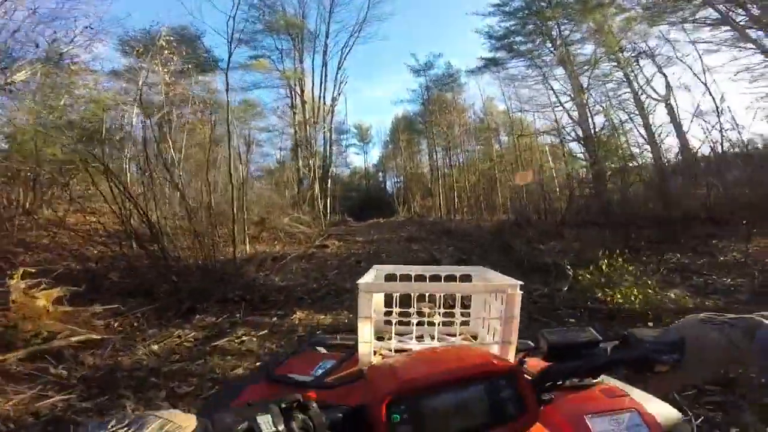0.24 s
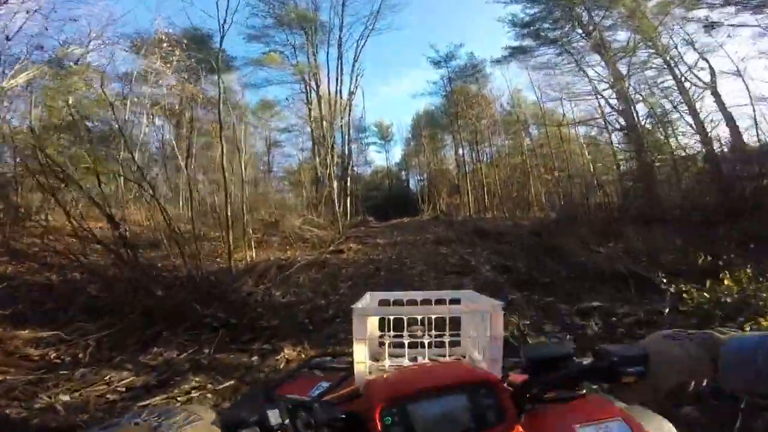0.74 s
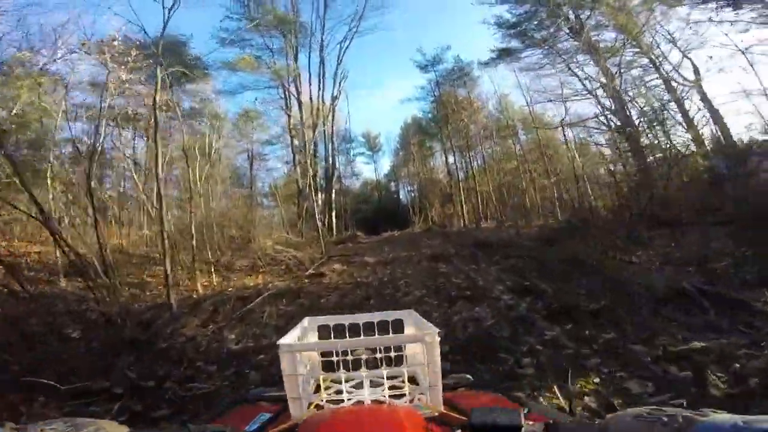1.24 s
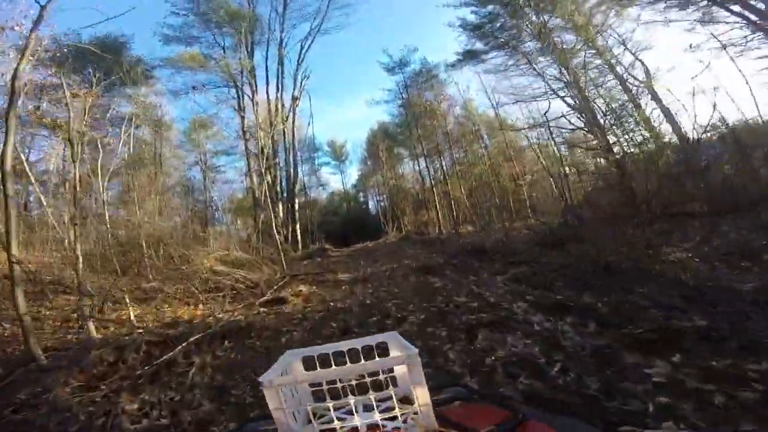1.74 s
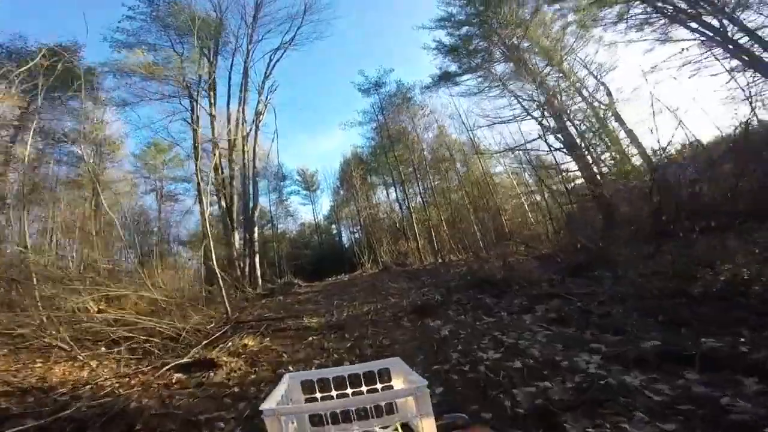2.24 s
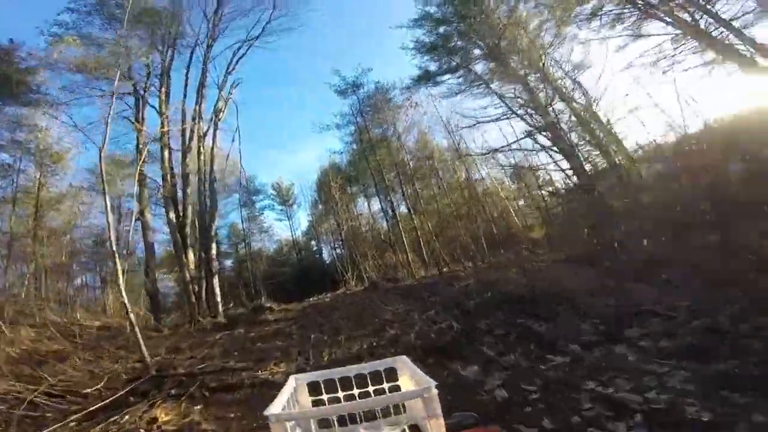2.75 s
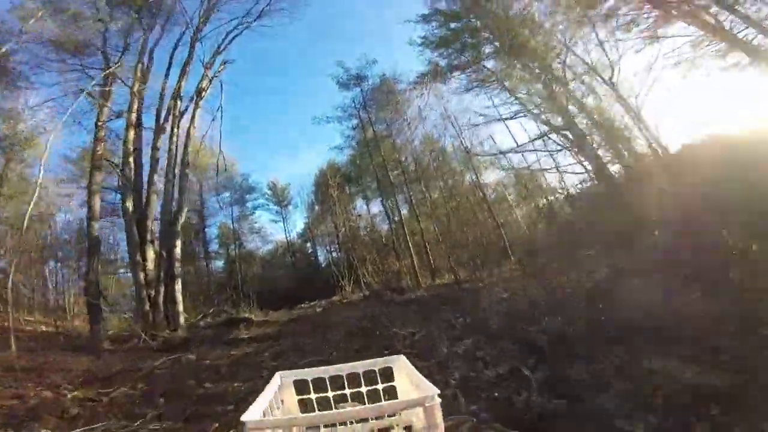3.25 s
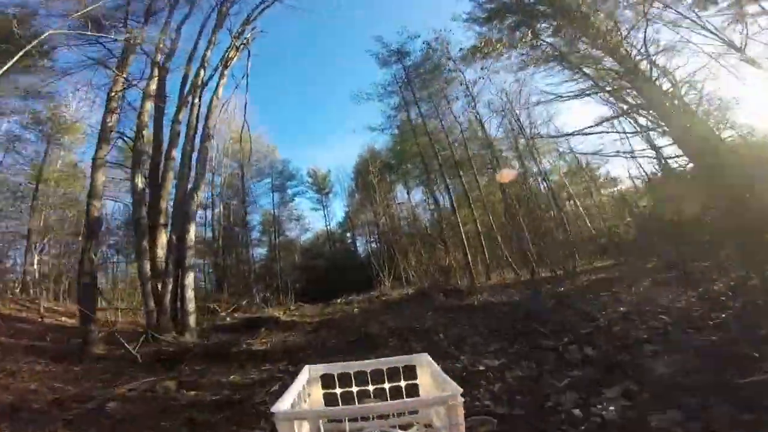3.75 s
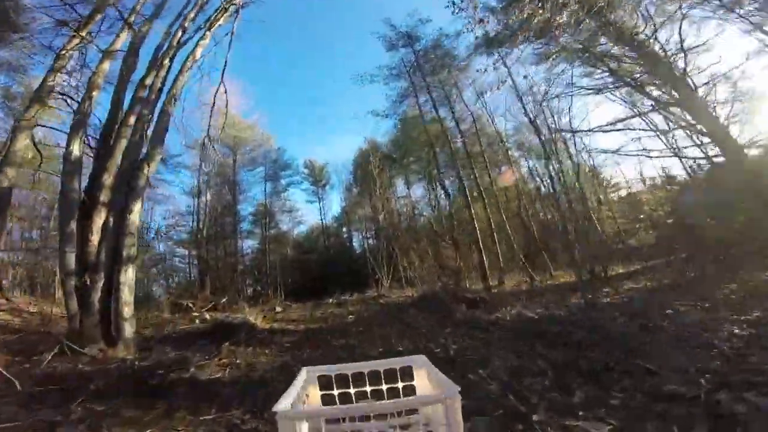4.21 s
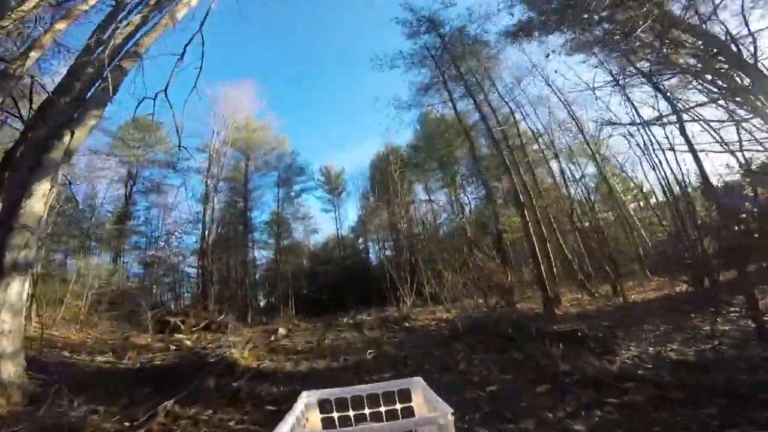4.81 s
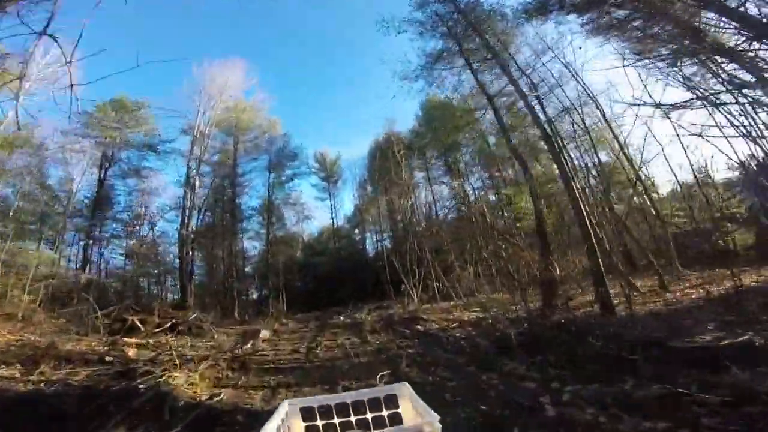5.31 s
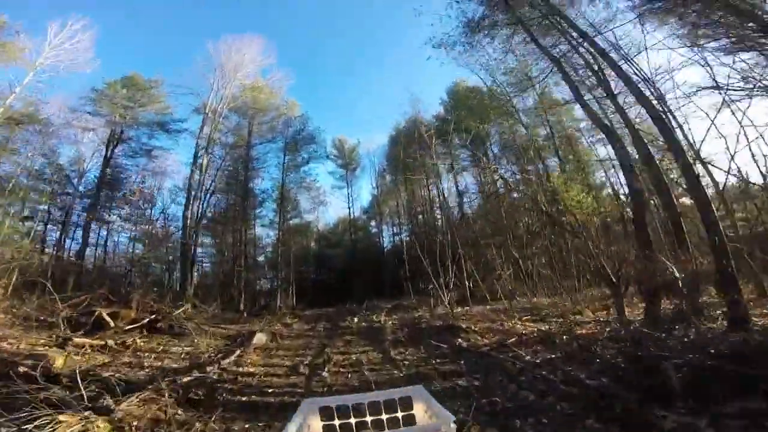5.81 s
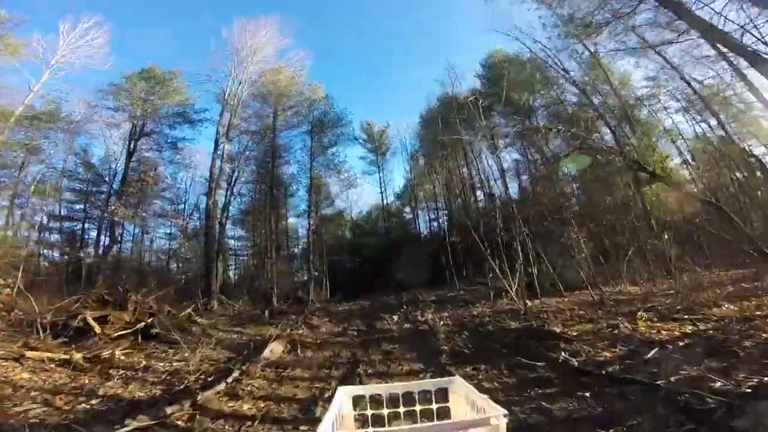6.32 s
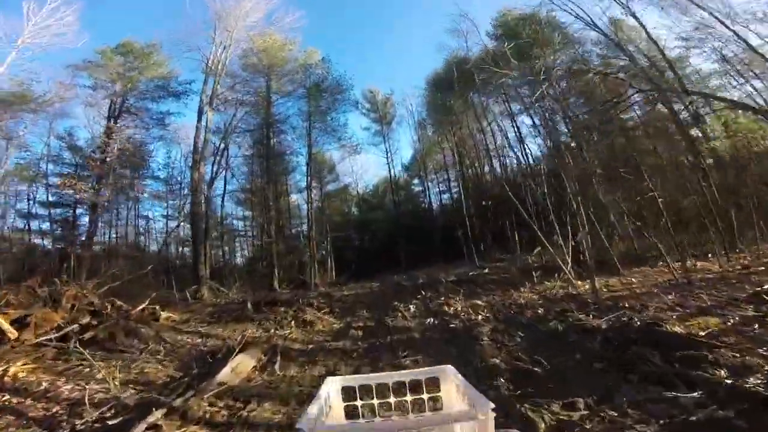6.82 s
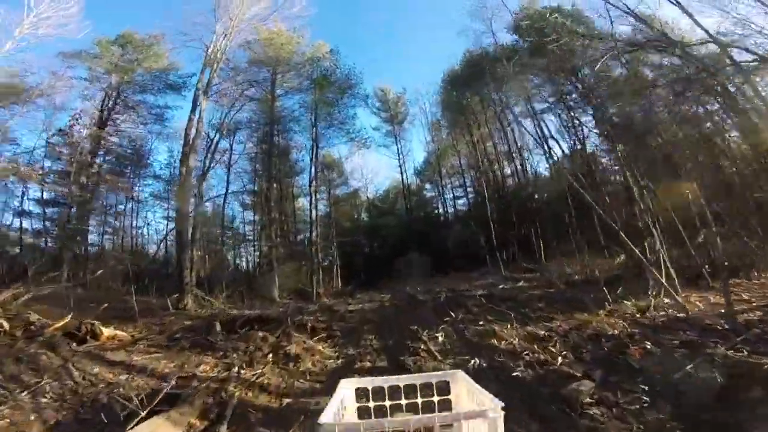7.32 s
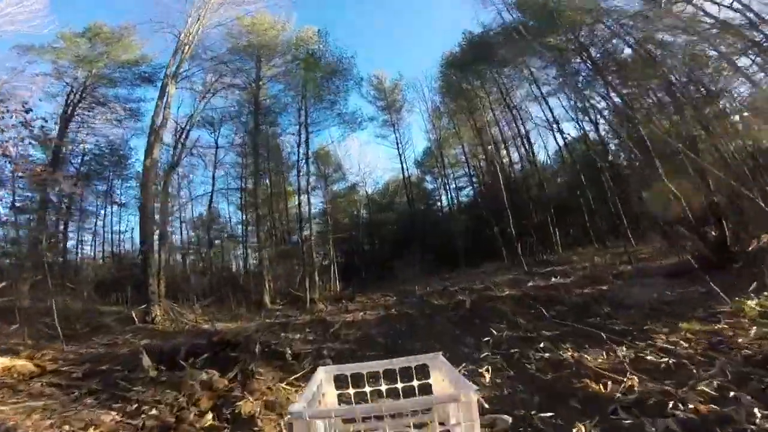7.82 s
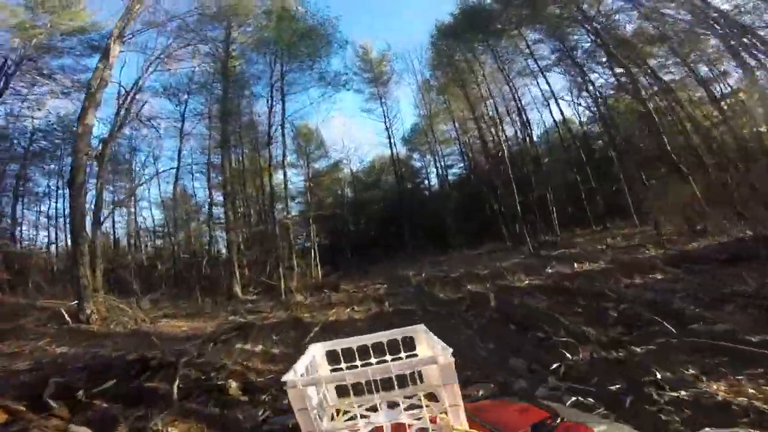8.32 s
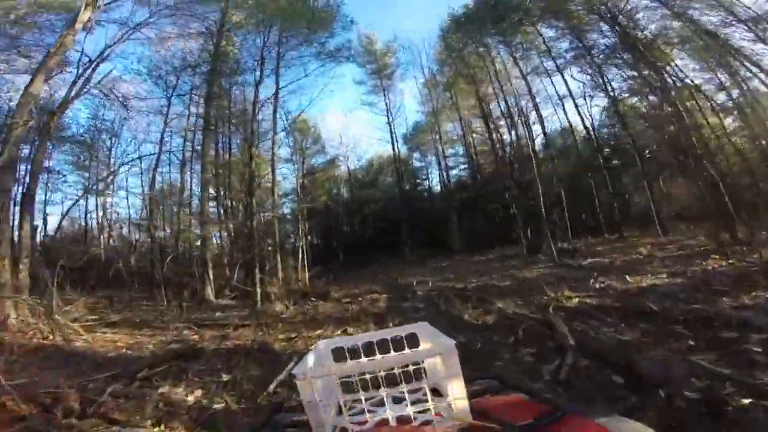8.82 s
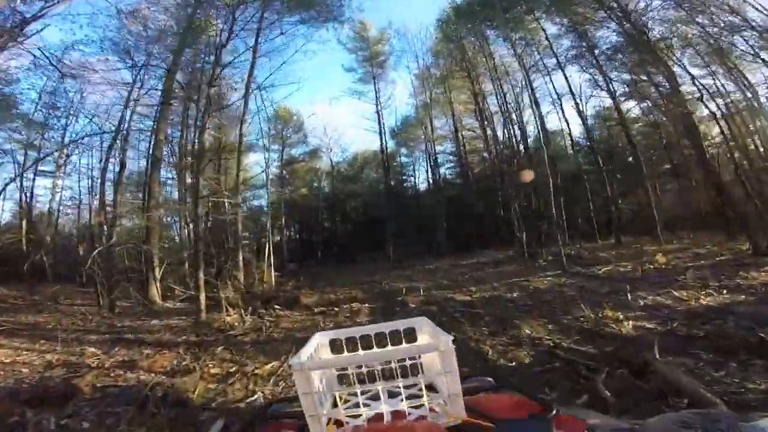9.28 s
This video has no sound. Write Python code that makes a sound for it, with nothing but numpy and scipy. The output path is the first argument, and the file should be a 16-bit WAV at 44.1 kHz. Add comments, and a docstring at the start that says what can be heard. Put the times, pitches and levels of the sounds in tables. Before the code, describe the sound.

A quad bike putters along slowly with a clattering engine, its tyres snapping sticks and crunching dry leaves.

```python
"""On a woodland trail a single-cylinder quad bike crawls along, heard from a camera on the rider.
Periodic gas pulses make the exhaust putter, and valve impacts clatter over the rasp of the gears.
The tyres shake the frame, crush leaves and snap sticks; bumps thud and a loose metal part clinks.
The camera's plastic case acts as a filter: it muffles the treble and rings at its own resonances."""
import sys
import numpy as np
from scipy import signal
from scipy.fft import rfft, irfft
from scipy.io import wavfile
from scipy.ndimage import uniform_filter1d

SR = 44100
rng = np.random.default_rng(int(sys.argv[2]) if len(sys.argv) > 2 else 0)


def wav_record(signal):
    """Record a signal, one row per channel, as 16-bit PCM in the file named by sys.argv[1]."""
    frames = np.transpose(np.atleast_2d(signal))
    bounded = np.clip(frames, -1, 1)
    # unit amplitude maps onto the largest positive 16-bit level
    quanta = np.round(bounded * 32767).astype(np.int16)
    wavfile.write(sys.argv[1], SR, quanta)


N = 421155
TIME = np.arange(N) / SR


def undb(db):
    """Amplitude grows tenfold for every 20 dB."""
    return 10 ** (np.asarray(db) / 20)


def unit(x):
    """Normalisation to an rms of 1."""
    return x / np.sqrt(np.mean(x ** 2))


def power_sum_db(gains):
    """Incoherent addition: unrelated sounds sum in power."""
    return 10 * np.log10(sum(g ** 2 for g in gains))


def wander(rate_hz):
    """A moving average smooths random steps into a drift of rms 1."""
    k = int(SR / rate_hz)
    steps = np.repeat(rng.standard_normal(N // k + 1), k)
    return unit(uniform_filter1d(steps, k)[:N])


def swell(s, attack, release):
    """Exponential growth to 1 at time s, then exponential decay."""
    return np.exp(np.minimum((TIME - s) / attack, (s - TIME) / release))


def add(track, s, sound):
    """Superposition: a sound joins the track at time s."""
    i = int(s * SR)
    track[i:i + len(sound)] += sound[:N - i]


def burst(response, t60, rise, ragged_db):
    """Impact excitation: a dying cluster of blows drives a resonant body; the envelope sets the energy."""
    t = TIME[:SR // 4]
    envelope = undb(-60 * t / t60) * (1 - np.exp(-t / rise))
    sizes = undb(ragged_db * np.repeat(rng.standard_normal(len(t)), 32)[:len(t)])
    blows = envelope * sizes * rng.standard_normal(len(t))
    x = signal.fftconvolve(blows, response)[:len(t)]
    return x * np.linalg.norm(envelope) / np.linalg.norm(x)


def ring(x, hz, width_hz, direct):
    """Resonance stresses one band over a direct share of the sound, at equal total energy."""
    y = direct * x + signal.lfilter(*signal.iirpeak(hz, hz / width_hz, fs=SR), x)
    return y * np.linalg.norm(x) / np.linalg.norm(y)


# Resonances of the case. Each row: centre in Hz, width in Hz, boost in dB.
CASE_MODES = [(930, 16, 4), (1349, 140, 5), (1481, 213, 12), (1948, 47, 6), (2094, 224, 7.5),
              (2583, 75, 10), (2734, 250, 5.5), (2943, 77, 8), (3201, 137, 7), (3348, 181, 13),
              (4020, 290, 5), (4780, 100, 6.5), (5490, 87, 5.5), (6065, 320, 7), (7870, 210, 6),
              (8840, 560, 5.5)]

def case_response(spectrum):
    """Filters in series add in dB: source spectrum and case modes give one unit-energy impulse response."""
    size = 8192
    f = np.arange(size // 2 + 1) * SR / size
    hz, db = np.transpose(spectrum)
    db = np.interp(np.log(f + 1), np.log(hz), db)
    db -= 40 * np.log10(np.maximum(f / hz[-1], 1))  # 12 dB per octave above the last row
    db += sum(boost / (1 + (2 * (f - centre) / width) ** 2) for centre, width, boost in CASE_MODES)
    # minimum phase: every impact starts sharply and rings afterwards
    cepstrum = irfft(np.log(undb(db)))
    response = irfft(np.exp(rfft(2 * cepstrum[:size // 2], size)))
    return response / np.linalg.norm(response)


def through_case(x, spectrum):
    """Convolution gives an excitation the colour of its source and of the case."""
    return signal.fftconvolve(x, case_response(spectrum))[:N]


# Spectra of the muffler and the air box. Each row: frequency in Hz, relative level in dB.
MUFFLER_SPECTRUM = [(20, -3.5), (30, 1.5), (50, -25), (78, -11), (96, 1.5), (112, 1), (136, 2.5),
                    (158, -11.5), (215, -22), (290, -18.5), (420, -29), (900, -43)]
AIRBOX_SPECTRUM = [(60, -35), (160, -8), (205, -8), (235, 3.5), (265, -4), (330, -14.5), (500, -35),
                   (1200, -57)]

def engine_putter(cycle, throb_db, pipe_db, intake_db):
    """Forced vibration: the crank shakes twice per firing; uneven pulses drive muffler and air box."""
    throb = unit(np.sin(4 * np.pi * cycle) * undb(2.4 * wander(12)))
    firings = np.diff(np.floor(cycle), prepend=0)
    puffs = unit(firings * undb(0.57 * rng.standard_normal(N)))
    gulps = unit(firings * undb(2.0 * rng.standard_normal(N)))
    muffler = through_case(puffs * undb(pipe_db), MUFFLER_SPECTRUM)
    airbox = through_case(gulps * undb(intake_db), AIRBOX_SPECTRUM)
    return throb * undb(throb_db) + muffler + airbox


# Valve closures. Each row: place in the engine cycle from 0 to 1, relative level in dB.
VALVE_CLOSURES = [(.07, 5.5), (.5, 7)]
# Spectra of the valves and the gears. Each row: frequency in Hz, relative level in dB.
TICK_SPECTRUM = [(500, -30), (1400, -1.5), (2400, -2.5), (3000, 0.5), (3380, -2.5), (3800, -6), (5000, -24),
                 (6500, -9), (8500, -17.5), (10000, -28), (15000, -36)]
RASP_SPECTRUM = [(150, -17.5), (300, 8), (500, 3), (800, -2.5), (1150, -2.5), (1500, 2), (2000, 1),
                 (2400, -6), (3100, -6.5), (3700, -8.5), (5000, -16), (8500, -20), (10000, -23.5),
                 (15000, -34.5)]

def valve_gear(cycle, rasp_db, tick_db):
    """Amplitude-modulated noise: two valves tick per cycle, and chain and gears surge with each firing."""
    firing = cycle.astype(int)
    strength = undb(1.8 * rng.standard_normal((N // 100, len(VALVE_CLOSURES))))
    ticks = 0
    for k, (place, db) in enumerate(VALVE_CLOSURES):
        age = ((cycle - place) % 1) / 0.055  # a tick peaks 0.055 cycles after the closure
        ticks += undb(db) * strength[firing, k] * age * np.exp(-age)
    valves = through_case(unit(ticks * rng.standard_normal(N)) * undb(tick_db), TICK_SPECTRUM)
    surge_db = 2.0 * np.cos(2 * np.pi * (cycle + 0.2)) + 0.72 * wander(90) + 1.2 * wander(11)
    gears = through_case(rng.standard_normal(N) * undb(rasp_db + surge_db), RASP_SPECTRUM)
    return valves + gears


# Dips in the trail. Each row: peak time in seconds, half-width in seconds, sway in dB, throb in dB.
DIPS = [(0.08, 0.088, -44, -41), (0.75, 0.28, -48, -37.5), (1.66, .15, -37.5, -47), (3.64, .12, -47, -45.5),
        (8.62, 0.14, -39, -64), (9.08, 0.13, -40.5, -51)]

def lurches(sway_db, throb_db):
    """Transient loading: each dip adds a Gaussian swell to the frame's sway and the crank's throb."""
    sway, throb = [undb(sway_db)], [undb(throb_db)]
    for s, width, heave_db, labour_db in DIPS:
        dip = np.exp(-((TIME - s) / width) ** 2)
        sway.append(undb(heave_db) * dip)
        throb.append(undb(labour_db) * dip)
    return power_sum_db(sway), power_sum_db(throb)


# Roots and ruts. Each row: start in seconds, level in dB, ring in Hz, 60 dB decay in seconds (capped below).
JOLTS = [(0.421, -39, 191, 0.18), (0.602, -38.5, 235, 0.31), (1.164, -35.5, 182, 0.24),
         (1.549, -38, 240, 0.3), (1.83, -32.5, 143, 0.27), (1.864, -30, 232, 0.14),
         (3.271, -39.5, 153, 0.22), (3.695, -34.5, 308, 0.33), (3.744, -29, 410, 0.096),
         (4.279, -37, 225, 0.16), (4.428, -39.5, 183, .14), (5.491, -39, 441, 0.24),
         (5.673, -35.5, 283, .15), (6.716, -40.5, 275, 0.18), (6.919, -37, 198, 0.32),
         (7.413, -35, 199, 0.11), (7.755, -37, 143, 0.18), (7.832, -33.5, 217, 0.14),
         (8.147, -35.5, 440, .12), (8.357, -33, 206, 0.19), (8.449, -33, 230, 0.14),
         (8.499, -36.5, 261, 0.18), (8.656, -35, 186, 0.15), (8.852, -34, 180, 0.23),
         (8.913, -30.5, 142, 0.13), (9.278, -33.5, 230, 0.25), (9.319, -30, 202, 0.12)]
# Spectra of the panel, the frame and the tyres. Each row: frequency in Hz, relative level in dB.
PANEL_SPECTRUM = [(40, -1), (110, -8), (180, 2.5), (300, -1.5), (500, -2.5), (800, -18), (1500, -18),
                  (3000, -21), (4500, -49)]
SWAY_SPECTRUM = [(5, -8), (15, -1), (28, 7.5), (50, -2), (90, -13), (300, -109)]
RUMBLE_SPECTRUM = [(30, -8.5), (70, 2.5), (130, 0), (220, 2.5), (330, -6), (500, -9), (800, -13.5),
                   (1500, -32), (4000, -81)]

def chassis(sway_db, rolling_db):
    """Structure-borne sound: knobbly tyres shake the frame, and each jolt sets a plastic panel booming."""
    thuds, panel = np.zeros(N), case_response(PANEL_SPECTRUM)
    roughness = [undb(rolling_db)]
    for s, db, hz, t60 in JOLTS:
        blow = burst(panel, min(t60, 0.28), rise=0.0032, ragged_db=2)
        add(thuds, s, undb(db) * ring(blow, hz, width_hz=22, direct=0.57))
        roughness.append(undb(db - 19) * swell(s, 0.14, 0.14))  # rough ground around the bump
    sway = through_case(rng.standard_normal(N) * undb(sway_db), SWAY_SPECTRUM)
    shaking = rng.standard_normal(N) * undb(power_sum_db(roughness) + wander(16))
    return sway + through_case(shaking, RUMBLE_SPECTRUM) + thuds


# Heaps of dry brush. Each row: peak time in seconds, level in dB, attack and release in seconds.
BRUSH_HEAPS = [(1.87, -45, .05, 0.093), (2.288, -34, 0.088, 0.093), (2.62, -49, 0.17, 0.43),
               (3.68, -48, 0.079, .1), (5.32, -46, 0.05, 0.12), (5.49, -42, 0.04, 0.13),
               (5.92, -53, 0.079, .35), (8.92, -50.5, 0.36, 0.4)]
# Spectra of crushed leaves and splinters. Each row: frequency in Hz, relative level in dB.
CRUNCH_SPECTRUM = [(300, -21), (1000, -6), (1500, 5), (2600, 5), (3300, 4), (4500, -6.5), (6500, -4.5),
                   (8500, -15), (10000, -24), (15000, -34)]
SPLINTER_SPECTRUM = [(2500, -67), (4500, -2), (6500, 8), (8500, 3), (10000, -5), (15000, -20)]

def leaves(litter_db, per_second=2800, spread_db=3.0):
    """Shot noise: countless tiny fractures merge; the harder the tyres crush, the brighter the sound."""
    heaps = [undb(db) * swell(s, attack, release) for s, db, attack, release in BRUSH_HEAPS]
    level_db = power_sum_db([undb(litter_db)] + heaps)
    sizes = undb(spread_db * np.minimum(rng.exponential(size=N), 5))
    signs = rng.choice([-1, 1], (2, N))
    fractures = rng.random(N) < per_second / SR
    grains = unit(fractures * sizes) * undb(level_db + 2.0 * wander(45))
    bright_db = 0.5 * (level_db - level_db.max()) - 9.5
    crunch = through_case(grains * signs[0], CRUNCH_SPECTRUM)
    splinters = through_case(grains * signs[1] * undb(bright_db), SPLINTER_SPECTRUM)
    return crunch + splinters


def twigs(per_second=2, db=-42, spread_db=6, hz=1920, knock_db=-16, splinter_db=-16, t60=0.042):
    """Small breaks scatter uniformly in time, level and pitch, as rows like those of the sticks."""
    chance = rng.random((int(per_second * N / SR), 3))
    return [(when * N / SR, db + spread_db * (2 * size - 1), hz * 2 ** (thin - 0.5),
             knock_db, splinter_db, t60) for when, size, thin in chance]


# Breaking sticks. Each row: start in seconds, level in dB, ring in Hz, knock and splinters in dB
# relative to the crack, the crack's 60 dB decay in seconds.
STICK_BREAKS = [(0.691, -35.5, 1460, -12, -12, 0.036), (1.796, -35, 3250, -21, -12, 0.084),
                (1.8163, -33.5, 3220, -15, -23, .056), (1.866, -32.5, 1370, -5, -22, 0.044),
                (1.945, -34, 1460, -19, -24, 0.053), (2.006, -31, 3070, -27, -26, 0.034),
                (2.314, -21.5, 2600, -24, -16, 0.071), (2.378, -31.5, 2130, -19, -13, 0.1),
                (2.54, -30.5, 3300, -17, -8, 0.03), (2.6947, -33, 1430, -13, -28, 0.033),
                (3.3105, -32, 1440, -18, -28, 0.026), (3.6636, -43.5, 1410, -19, 1, 0.046),
                (3.92, -33, 2010, -13, -14.5, .046), (4.2622, -33, 2080, -11, -15, 0.031),
                (5.2985, -34, 3320, -27, -14, .08), (5.3889, -25.5, 3430, -11, -17, 0.079),
                (5.4931, -10.3, 2140, -18.5, -20.5, .05), (5.537, -27.5, 1990, -6, -18, 0.041),
                (5.5792, -30, 2000, -15, -17, 0.07), (5.674, -21.5, 1320, -10, -16, 0.062),
                (5.742, -32, 1490, -25, -22, 0.033), (5.801, -23.5, 1950, -10, -7.5, 0.032),
                (5.8582, -25.5, 2450, -22, -17, 0.05), (5.871, -25.5, 2590, -18, -18, 0.034),
                (6.068, -29, 1460, -14, -19, 0.1), (6.1551, -36.5, 2880, -14, -28, 0.055),
                (6.214, -31, 1560, -18, -11.5, 0.043), (6.2848, -31.5, 1960, -26, -25, 0.045),
                (6.31, -32, 1950, -19, -23, 0.068), (7.1187, -28, 1980, -11, -21, .055),
                (7.607, -26, 1330, -10.5, -21.5, .1), (8.4915, -35, 1470, -17, -16, .12),
                (8.531, -27, 2070, -26, -14.5, 0.039), (8.898, -32, 3380, -12, -23, 0.045),
                (9.0728, -36, 3180, -23, -26, 0.13), (9.106, -30, 1420, -16, -28, .07),
                (9.1757, -31, 1590, -21, -4.5, 0.042), (9.194, -30, 1450, -28, -22, 0.074),
                (9.2222, -17.8, 1320, -18, -38, 0.03)]
# Spectra of the knock and the crack. Each row: frequency in Hz, relative level in dB.
KNOCK_SPECTRUM = [(80, -59), (250, 2), (550, -2), (820, 0), (1100, -1.5), (1600, -40), (4000, -92)]
CRACK_SPECTRUM = [(500, -50), (1100, -8.5), (1500, -3.5), (1900, 3), (2400, -1.5), (3300, -4), (4200, -9),
                  (6000, -29)]

def sticks():
    """Brittle fracture: fibres tear in a cluster, giving a ringing crack, a hollow knock and splinters."""
    out = np.zeros(N)
    knock, wood, splinter = map(case_response, (KNOCK_SPECTRUM, CRACK_SPECTRUM, SPLINTER_SPECTRUM))
    for s, db, hz, knock_db, splinter_db, t60 in STICK_BREAKS + twigs():
        rise = 0.011 * t60  # a slow break also takes longer to build
        crack = ring(burst(wood, t60, rise, ragged_db=4.0), hz, width_hz=330, direct=0.76)
        add(out, s, undb(db) * crack)
        add(out, s, undb(db + knock_db) * burst(knock, 1.32 * t60, rise, ragged_db=7.5))
        add(out, s, undb(db + splinter_db) * burst(splinter, 0.81 * t60, rise, ragged_db=1.5))
    return out


# Rattles of the loose metal part. Each row: start in seconds, level in dB.
RATTLES = [(1.6985, -50), (1.8144, -46), (2.0073, -48), (2.5411, -42.5), (2.7934, -51), (3.7843, -46),
           (4.3051, -52), (4.6354, -44.5), (5.0275, -48.5), (7.0249, -55), (7.3454, -54), (7.4294, -56),
           (8.0222, -46.5), (8.2694, -54), (9.0728, -48), (9.419, -52)]
# Its modes. Each row: frequency in Hz, relative level in dB, 60 dB decay in seconds.
METAL_MODES = [(5140, -3, .04), (6180, -6, 0.069), (7930, 3, .14), (8670, 3, .06), (8580, -3, 0.036),
               (9450, -6, .11), (10300, -6, .06), (12400, -13, .08), (12920, -15, .05), (14500, -11, .07)]

def clinks():
    """Modal vibration: a loose part chatters, exciting its damped modes in a different mix each time."""
    out, t = np.zeros(N), TIME[:SR // 4]
    modes = sum(undb(db - 60 * t / t60) * np.sin(2 * np.pi * hz * t) for hz, db, t60 in METAL_MODES)
    for s, db in RATTLES:
        add(out, s, undb(db) * burst(modes, t60=0.041, rise=0.00062, ragged_db=4))
    return out


# Engine speed. Each row: time in seconds, firing rate in Hz.
FIRING_RATE = [(0.0, 18.9), (0.42, 19.2), (0.87, 19.0), (1.75, 22.6), (2.2, 26.6), (2.66, 28.2),
               (3.48, 28.1), (4.23, 25.2), (5.18, 26.6), (5.56, 27.7), (6.28, 27.4), (6.6, 24.7),
               (6.97, 26.3), (7.87, 26.2), (8.01, 24.1), (8.24, 25.3), (8.56, 23.6), (9.55, 22.8)]
# The rider's throttle. Each row: time in seconds, opening from 0 to 1.
THROTTLE_OPENING = [(0, 0.4), (1.0, 0.7), (1.95, 0.7), (2.9, 0.67), (3.8, 0.95), (4.2, 0.42), (5.3, 0.5),
                    (5.7, 0.8), (6.55, 0.04), (7.3, 0), (7.8, 0.5), (8.1, 0.1), (8.5, 0.85), (9.2, 0.9),
                    (9.55, 0.6)]
IDLE_HZ, FULL_LOAD_DB = 19, 3.5

def scene():
    """Superposition of engine, frame and trail; speed and throttle set the machine's steady levels."""
    firing_hz = np.interp(TIME, *np.transpose(FIRING_RATE))
    load_db = FULL_LOAD_DB * np.interp(TIME, *np.transpose(THROTTLE_OPENING))
    cycle = np.cumsum(firing_hz * (1 + 0.007 * wander(20))) / SR
    # levels run from their value at idle, with a slope in dB per octave of engine speed
    octaves = np.log2(firing_hz / IDLE_HZ)
    sway_db, throb_db = lurches(sway_db=-48.5 - 5.5 * octaves, throb_db=-46 - 10 * octaves)
    pipe_db = -49.5 + 0.5 * octaves + load_db
    putter = engine_putter(cycle, throb_db, pipe_db, intake_db=-48.5 - 25 * octaves)
    clatter = valve_gear(cycle, rasp_db=-51.5 + 7.5 * octaves + load_db, tick_db=-52.5 - 7.5 * octaves)
    frame = chassis(sway_db, rolling_db=-51 - 0.5 * octaves) + clinks()
    trail = leaves(litter_db=-57) + sticks()
    return (putter + clatter + frame + trail)[None]


def record(dry):
    """Band limiting: the camera's steep low-pass filter cuts the treble above 15.4 kHz."""
    return signal.sosfilt(signal.ellip(10, 0.2, 80, 15400, fs=SR, output="sos"), dry)


dry = scene()
out = record(dry)
wav_record(out)
```